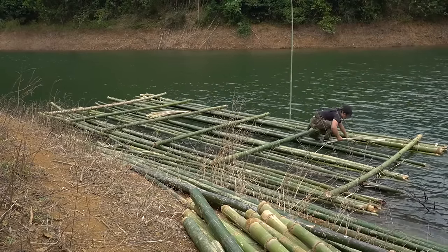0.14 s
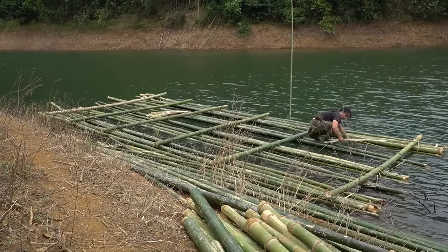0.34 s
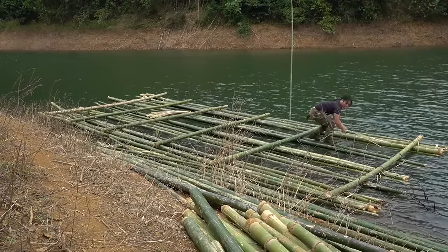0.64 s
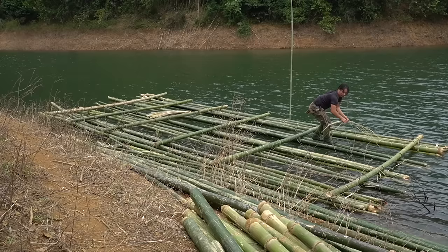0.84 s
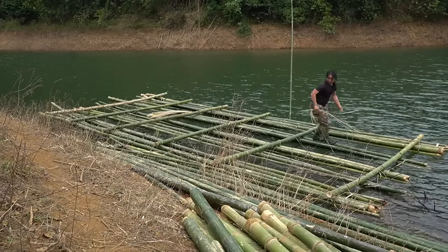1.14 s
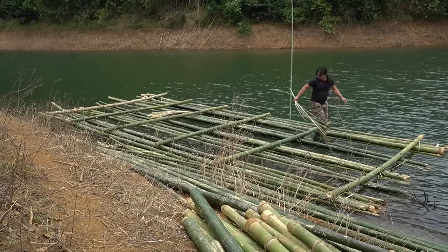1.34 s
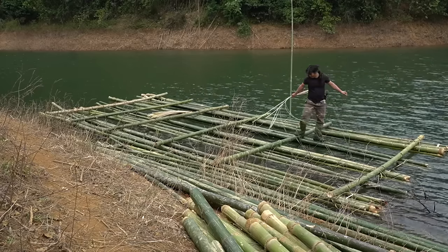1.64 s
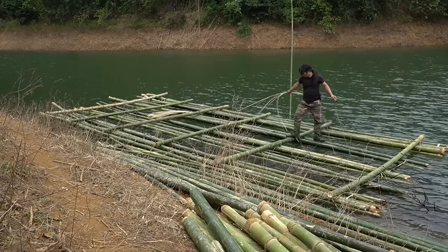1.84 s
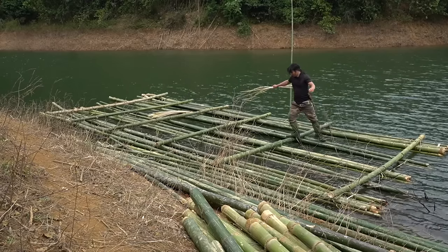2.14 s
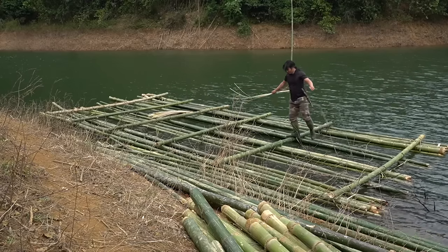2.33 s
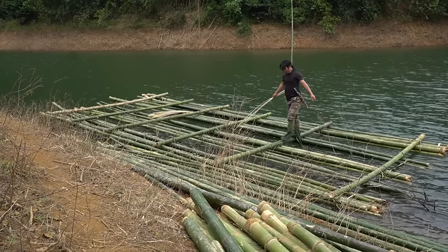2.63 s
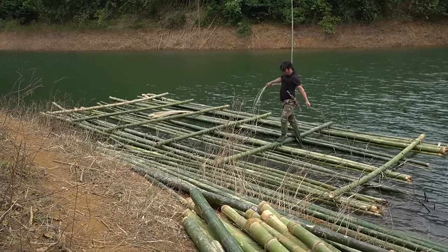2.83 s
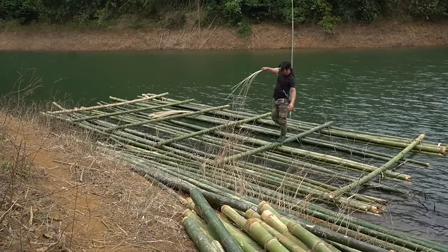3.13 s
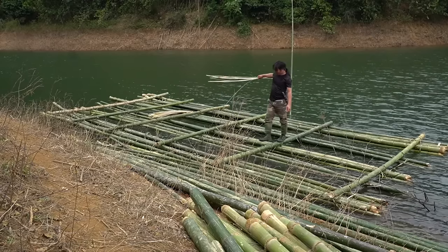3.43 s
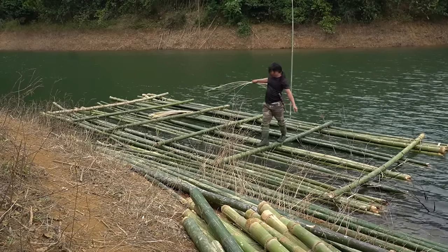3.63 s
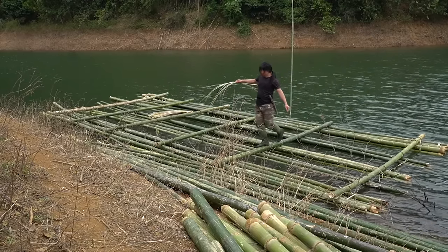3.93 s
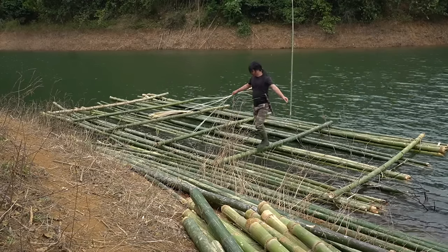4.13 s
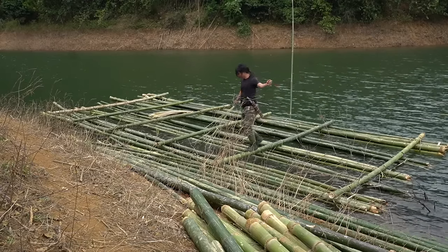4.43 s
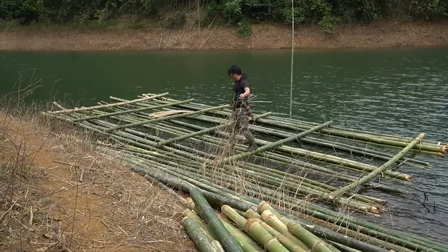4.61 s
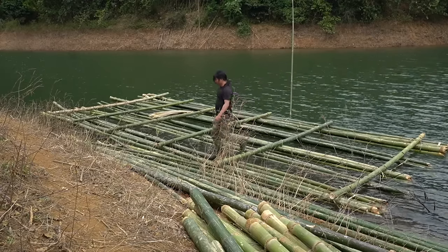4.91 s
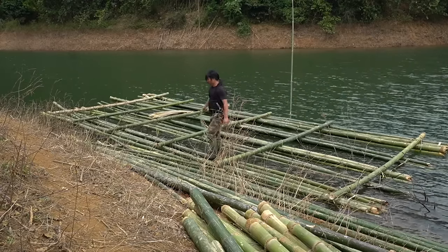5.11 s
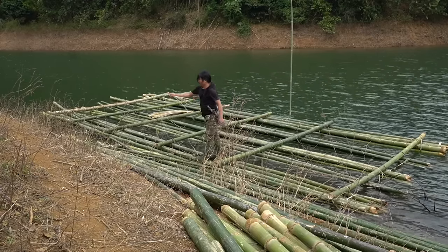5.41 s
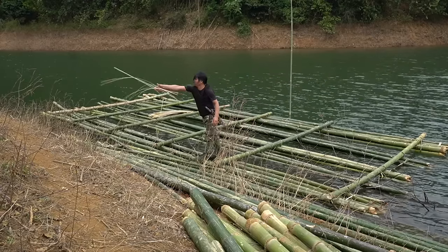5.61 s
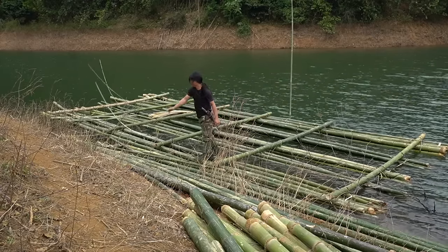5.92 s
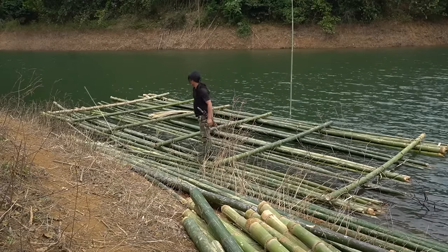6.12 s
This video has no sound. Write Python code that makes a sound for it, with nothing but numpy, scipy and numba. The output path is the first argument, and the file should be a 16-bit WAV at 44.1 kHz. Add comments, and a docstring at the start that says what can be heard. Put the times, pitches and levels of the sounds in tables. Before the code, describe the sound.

Hollow bamboo poles knock and tick under someone's steps on a floating raft, water gurgling between them, while wind gusts rumble on the microphone.

```python
"""Gusts buffet the microphone and water laps, while hollow poles knock and tick under someone's steps.
Place: loose bamboo poles of a raft on a lake. Microphone: on the shore, some metres off, two close ports.
Wind is noise evened out into a throb; water is grainy noise with rising bubble tones between the poles.
Ticks are short noise bursts; knocks are decaying chamber tones plus a rattle in the raft's modes."""
import sys
import numpy as np
from scipy import signal
from scipy.fft import rfft, irfft
from scipy.io import wavfile
from scipy.ndimage import uniform_filter1d, minimum_filter1d
from numba import njit

SR = 44100
rng = np.random.default_rng(int(sys.argv[2]) if len(sys.argv) > 2 else 0)


def master_out(mix):
    """Clip the mix to full scale and print it as 16-bit PCM to the path in sys.argv[1]."""
    frames = np.transpose(np.atleast_2d(mix))
    ceiling = np.clip(frames, -1, 1)
    pcm = np.round(ceiling * 32767).astype(np.int16)
    wavfile.write(sys.argv[1], SR, pcm)


N = 276048

# wind on the capsule: t/s, gust level/dB
GUSTS = [(0.0, -28), (0.05, -43), (0.14, -19.5), (0.57, -14), (0.61, -26), (0.64, -12.5), (0.7, -24),
         (0.77, -17), (0.91, -26.5), (1.06, -8), (1.11, -22), (1.25, -24.5), (1.31, -25), (1.36, -14),
         (1.48, -17.5), (1.51, -32), (1.57, -28.5), (1.73, -12), (2.3, -14), (2.34, -19.5), (2.41, -16.5),
         (2.44, -28), (2.6, -16), (2.79, -14.5), (2.96, -31.5), (3.01, -24), (3.14, -31), (3.24, -18),
         (3.52, -34.5), (4.15, -25.5), (4.2, -17), (5.21, -25.5), (5.4, -18.5), (5.44, -27.5), (5.53, -15),
         (5.68, -12), (5.72, -24), (6.12, -12), (6.17, -22.5), (6.26, -17.5)]
# colour of the wind: t/s, throb level/dB re gust, throb centre f/Hz, flutter level/dB re gust
EDDIES = [(0, -11, 58, -4), (.2, -6, 61.2, -19), (.55, -5.5, 59, -12), (.95, -2.5, 58, -9.5),
          (1.2, -3, 58, -7), (1.5, -8.5, 57.6, -16.5), (1.68, -3, 61, -3), (1.9, -4.5, 60, -5.5),
          (2.45, -3, 57.8, -8), (2.75, -1.5, 57, -5.5), (2.9, -6.5, 59.6, -16.5), (3.5, -9, 59.4, -14.5),
          (3.75, -14, 66.4, -2), (4.08, 1.5, 59, -21), (4.17, -4.5, 58, -7), (4.35, -1.5, 58, -16.5),
          (4.7, 1.5, 68.6, -17.5), (5.3, -3, 56.7, -17.5), (5.6, 4, 72.4, -7), (5.78, -1.5, 68.5, -1.5),
          (6.05, 2, 87, -8.5), (6.26, -0.5, 86, -5)]
# wind colours, applied twice: f/Hz, level/dB per pass
RUMBLE_COLOUR = [(20, -1), (30, -4), (44, -6), (58, -2)]
FLUTTER_COLOUR = [(100, 1), (130, -0.5), (170, -3.5), (220, -6), (300, -13)]
# calm water round the raft, before chance swell: t/s, lapping level/dB, spray level/dB
CALM_WATER = [(0, -38.5, -54), (.4, -39.5, -55), (.95, -38, -48), (1.12, -49, -59), (1.2, -36.5, -45),
              (1.42, -36.5, -51), (1.58, -41.5, -55), (1.8, -50, -61), (1.95, -42.5, -59), (2.2, -46, -70),
              (2.45, -40.5, -57), (2.65, -38, -55), (2.78, -41.5, -56.5), (3.2, -42, -59.5),
              (3.5, -39.5, -60), (4.2, -38.5, -54.5), (4.65, -37, -60), (5.3, -38, -51.5),
              (5.65, -42.5, -60), (6.26, -40, -53)]
# water pushed up between the poles by a step:
# peak t/s, gurgle level/dB, slosh level/dB, fizz level/dB, length/s
SURGES = [(0.487, -43, -30.5, -39.5, 0.21), (0.695, -43, -41, -38, 0.12), (1.02, -39, -33, -39.5, 0.11),
          (1.159, -38, -45, -36, 0.038), (1.27, -33, -46, -54, 0.054), (1.458, -44, -25, -31, 0.056),
          (1.659, -29.5, -32, -39.5, 0.085), (1.833, -36.5, -39, -55, 0.073),
          (2.224, -36, -35.5, -43.5, 0.077), (2.434, -61, -43, -55, 0.15), (2.727, -30, -37, -61.5, 0.019),
          (2.82, -31.5, -31, -61, 0.043), (3.112, -31, -33.5, -39.5, 0.2), (3.165, -39, -32, -39, 0.047),
          (3.258, -35, -30, -40, 0.064), (3.399, -32, -35, -59, 0.087), (3.602, -26.5, -49, -51, 0.028),
          (3.666, -37, -42, -36.5, 0.11), (3.795, -30.5, -26.5, -34.5, 0.18), (3.955, -29, -32, -41, 0.048),
          (4.225, -34.5, -44, -37, 0.064), (4.327, -32.5, -37, -39.5, 0.073),
          (4.497, -26.5, -27.5, -37, 0.066), (4.701, -33.5, -33, -58, 0.099),
          (4.837, -25, -26.5, -37, 0.068), (4.88, -22.5, -29.5, -41, 0.088),
          (5.027, -27, -31, -33.5, 0.073), (5.271, -22, -29, -33.5, 0.051), (5.57, -36, -28, -35, 0.055),
          (6.031, -29.5, -36, -40, 0.078), (6.158, -33.5, -28, -39, 0.083), (6.25, -37, -24, -30.5, 0.2)]
# water colours, deep to airy: f/Hz, level/dB (per Hz)
GURGLE_COLOUR = [(240, 4.5), (350, 4.5), (520, 4), (640, 4)]
SLOSH_COLOUR = [(560, -9), (700, 0), (880, 8.5), (1100, -0.5), (1450, -2), (1700, -6), (2200, -16)]
FIZZ_COLOUR = [(1800, 5), (2500, 6), (3550, 6), (4300, 0.5), (5800, 0.5), (7200, -11), (8500, -17)]
SPRAY_COLOUR = [(7000, 7), (8500, 3), (11000, 6), (14500, 0.5), (16000, -7)]  # also the airy top of the ticks
# dry ticks and scuffs: t/s, nominal peak level/dB, crack centre f/Hz, airy top level/dB re crack, t60/s
TICKS = [(0.0497, -19.5, 2670, -10, 0.021), (0.4064, -20.5, 3190, -25, 0.045), (0.4246, -22, 3070, 0, .022),
         (.547, -14, 2440, -30, 0.016), (0.593, -18, 3210, -30, .012), (.669, -21.5, 3450, 0, 0.024),
         (.7316, -19.5, 3260, -7, 0.031), (.852, -9, 2850, -15, 0.041), (0.979, -23.5, 5730, -0.5, 0.029),
         (1.1638, -22, 3280, -23, 0.018), (1.292, -21, 5040, -1.5, 0.066), (1.3333, -16, 3270, -28, 0.013),
         (1.4724, -9.5, 3620, 0, 0.021), (1.665, -17, 2740, -24, 0.017), (1.6924, -21, 2490, -8, .022),
         (1.703, -16.5, 4640, -9, .016), (1.7142, -19.5, 4950, -1, 0.021),
         (1.912, -21.5, 2700, -2.5, 0.056), (1.9577, -20.5, 5400, -18, .023),
         (1.9824, -31, 4000, -10, 0.012), (2.002, -9.5, 3440, -32, .012), (2.1161, -21.5, 3320, -11, 0.023),
         (2.4255, -22.5, 3540, -29, .027), (2.469, -27.5, 3570, 2, 0.012), (2.5092, -17, 3370, -25, .026),
         (2.6334, -21, 3500, -7, 0.021), (2.927, -20, 4500, -14, 0.027), (3.0644, -20, 2530, -30, 0.02),
         (3.1708, -18.5, 5400, -7, 0.021), (3.275, -18.5, 4140, -25, 0.022), (3.2816, -34, 5000, 1, .018),
         (3.635, -19, 2420, -18, .032), (3.71, -20, 4900, -22, 0.028), (3.7745, -18, 3770, -30, 0.028),
         (3.8796, -15, 4960, -30, 0.013), (3.937, -25, 3330, -30, 0.015), (3.956, -8, 3330, -14, 0.019),
         (4.027, -22, 2970, -22, 0.017), (4.183, -21, 5300, -12, 0.032), (4.2057, -19.5, 3400, -20, 0.031),
         (4.271, -19, 3430, -11, 0.05), (4.461, -18, 3370, -16, 0.046), (4.4903, -16, 3300, -40, 0.027),
         (4.5034, -14, 4360, -38, 0.023), (4.6885, -19.5, 3600, -38, 0.029), (4.808, -13, 3970, -24, 0.019),
         (4.818, -18, 2580, -8, .03), (4.865, 1.5, 2570, -20, 0.023), (4.893, -4.5, 2870, -16, .05),
         (4.9071, -13, 4250, -13, .043), (5.006, -12, 6200, -11, .01), (5.013, -10.5, 2600, -22, .03),
         (5.051, -12.5, 3670, -8, .015), (5.0901, -16, 4900, 0, 0.009), (5.234, -20, 3630, -20, .026),
         (5.254, -8.5, 3170, -10, 0.021), (5.2728, -12, 3320, -30, 0.029), (5.3192, -13.5, 3060, -12, .015),
         (5.3887, -21.5, 3500, -8, .031), (5.4306, -25, 3070, -2, .02), (5.551, -15.5, 3980, -28, 0.069),
         (5.886, -29.5, 5000, 6, 0.014), (5.893, -22.5, 3500, -8, 0.02), (5.9399, -24, 2800, -15, .02),
         (5.953, -21.5, 3100, -20, 0.018), (6.042, -21, 3000, -10, 0.013), (6.058, -21.5, 3480, -4, .03),
         (6.132, -22, 3740, -2, .02), (6.157, -19.5, 3550, -5, .046), (6.188, -14.5, 5160, -11, 0.037),
         (6.205, -16, 3000, -4, .04), (6.2425, -11.5, 5000, -22, 0.024)]
# broad snap of a tick: f/Hz, level/dB (per Hz)
SNAP_COLOUR = [(500, -16), (1500, 5), (3500, 3), (6000, 0), (8000, -39)]
# poles knocking: t/s, nominal peak level/dB, starting pitch of the struck chamber f/Hz,
# level of the shaking that drives the rattle/dB re blow
KNOCKS = [(.099, -31, 413, -5), (.377, -31.5, 854, 1), (.425, -24, 890, -8), (.461, -20, 970, -6),
          (.554, -14.5, 794, -29), (.596, -20.5, 707, -15), (.621, -20.5, 1630, -7), (.655, -25, 880, -23),
          (.702, -15, 730, -17), (.731, -16.5, 897, -27), (.853, -24, 774, -14), (1.011, -29, 1200, -9),
          (1.045, -15, 1100, -21), (1.109, -23, 860, -14), (1.249, -24, 520, -17), (1.333, -23, 994, -1.5),
          (1.438, -22, 846, -20), (1.464, -13.5, 906, -8), (1.664, -23, 700, -8), (1.811, -26, 1060, -3),
          (1.841, -17.5, 870, -21), (2.052, -26, 755, -24), (2.204, -32, 1560, -3), (2.217, -24, 600, -19),
          (2.385, -27, 1760, -9), (2.405, -12, 1100, -15), (2.422, -20, 865, -22), (2.469, -17, 1670, -3),
          (2.533, -30, 869, -8), (2.57, -22, 943, -8.5), (2.733, -22, 880, -14), (2.813, -17, 880, -15.5),
          (2.885, -20.5, 866, -7.5), (2.936, -28.5, 1100, -6), (3.063, -16, 1870, -11),
          (3.089, -23, 380, -15), (3.147, -29, 810, -5), (3.186, -17, 1720, -8), (3.241, -5.5, 1070, -15),
          (3.253, -21, 880, -3), (3.362, -20, 372, -16), (3.38, -12, 673, -31), (3.423, -23, 916, -12),
          (3.592, -26, 660, -12), (3.703, -19.5, 950, -27), (3.716, -15, 790, -11),
          (3.799, -14.5, 1620, -6.5), (3.848, -20.5, 2030, -21), (3.899, -6, 900, -15.5),
          (3.912, -12, 900, -26), (3.945, -23, 845, -11), (4.112, -23.5, 1070, -5), (4.221, -21, 540, -23),
          (4.322, -9.5, 340, -22.5), (4.488, -13, 910, -18), (4.503, -10.5, 826, -33),
          (4.669, -24, 1085, -2.5), (4.839, -15, 636, -17), (4.863, -8.5, 670, -7),
          (4.898, -17.5, 594, -1.5), (5.013, -13, 1670, -23), (5.111, -24.5, 900, -10),
          (5.146, -27, 910, -7), (5.254, -18, 1660, -9), (5.273, -16.5, 337, -5), (5.422, -10, 1230, -14.5),
          (5.555, -15.5, 1680, -15), (5.568, -21, 910, -10), (5.622, -22.5, 840, -8),
          (5.895, -29, 900, -15), (6.023, -24, 506, -14.5), (6.072, -20.5, 557, -27),
          (6.136, -19, 920, -19), (6.208, -16, 766, -15)]
# modes of the loose raft: f/Hz, relative level/dB, t60/s
RAFT_MODES = [(364, -12, 0.021), (683, -9.5, 0.0088), (920, -1, 0.036), (1123, -0.5, 0.0092),
              (1620, -13, 0.013), (1900, -21, 0.015), (3350, -12.5, 0.01)]

RUMBLE_DB = -1  # re gust
EDDIES_PER_S, EDDY_DB, FLUTTER_SWELL_DB = 14, 1.5, 2.5  # chance swell of the wind layers
LAPS_PER_S, LAP_DB = 7, 2.5  # chance swell of the calm water
LAP_GURGLE_DB, LAP_SLOSH_DB = -6, -0.5  # re lapping
SURGE_RISE, SURGE_FALL = 0.26, 1.57  # rise time as share of the length; steepness of the fall
SURGE_SPRAY_DB = -17.5  # re fizz
TICK_RISE = 0.054  # build-up time as share of the t60
# ring at 1 kHz and -20 dB; higher chambers and harder blows die sooner
KNOCK_T60_S, KNOCK_T60_POWER, HALVED_PER_DB = 0.035, -0.25, 22
# second mode of a chamber, re its pitch and peak
OVERTONE, OVERTONE_DB, OVERTONE_T60_S = 1.42, -10.5, 0.012
KNEE, CEILING, TOP_HZ = .55, .71, 16250


def undb(db):
    """Amplitude ratio of a level in dB."""
    return 10 ** (np.asarray(db) / 20)


def unit(x):
    """Scale to an rms of 1."""
    return x / np.sqrt(np.mean(x ** 2))


def curves(table):
    """Columns of a table, one value per sample."""
    s, *columns = np.transpose(table)
    return [np.interp(np.arange(N) / SR, s, c) for c in columns]


@njit
def svf(x, hz, width):
    """State-variable band-pass whose centre and width may move."""
    y, b, l = np.empty(len(x)), 0., 0.  # b, l: band and low-pass memories
    for i in range(len(x)):
        g, k = np.tan(np.pi * hz[i] / SR), width[i] / hz[i]
        v = (b + g * (x[i] - l)) / (1 + g * (g + k))
        b, l, y[i] = 2 * v - b, l + 2 * g * v, k * v
    return y


def band(x, hz, width):
    """Band-pass with a fixed centre and width in Hz."""
    return svf(x, hz + np.zeros(len(x)), width + np.zeros(len(x)))


def shape(x, points):
    """Colour by (Hz, dB) points, falling steeply outside them."""
    hz, db = np.transpose(points)
    f = np.log(np.arange(len(x) // 2 + 1) * SR / len(x) + 1)
    outside = np.maximum(np.log(hz[0]) - f, 0) + np.maximum(f - np.log(hz[-1]), 0)
    gain = undb(np.interp(f, np.log(hz), db) - 60 * outside)
    return irfft(rfft(x) * gain, len(x))


def walk(rate):
    """Random levels held 1 / rate s and slewed twice; rms 1."""
    k = int(SR / rate)
    steps = np.repeat(rng.standard_normal(N // k + 1), k)
    return unit(uniform_filter1d(uniform_filter1d(steps, k), k)[:N])


def add(out, s, sound):
    """Mix a sound in at time s."""
    i = int(max(s, 0) * SR)
    out[i:i + len(sound)] += sound[:N - i]


def ring(hz, t60, rise, glide=0.):
    """A decaying tone that builds up over the rise time, its pitch gliding; peak near 1."""
    t = np.arange(int(.15 * SR)) / SR
    swing = (1 - np.exp(-t / max(rise, 1 / SR))) * 1000. ** (-t / max(t60, .003))
    return swing / swing.max() * np.sin(2 * np.pi * hz * (t + glide * t ** 2))


def buffet(colour, span, share):
    """Noise coloured twice; in between its swing is evened out over span s, so that it throbs, not sputters."""
    x = unit(colour(rng.standard_normal(N)))
    power = uniform_filter1d(x ** 2, int(span * SR)) + 1e-3
    return unit(colour(x / power ** (share / 2)))


def eddying(x, db):
    """Let a wind layer swell by chance, db being the rms swing."""
    return unit(x * undb(db * walk(EDDIES_PER_S)))


def wind():
    """Eddies on the capsule: a deep rumble, a wandering throb and a flutter on top, each swelling by chance."""
    (gust_db,), (throb_db, hz, flutter_db) = curves(GUSTS), curves(EDDIES)
    hz = hz * np.exp(0.075 * walk(11.0))
    width = 0.92 * hz
    rumble = buffet(lambda x: shape(x, RUMBLE_COLOUR), 0.12, 0.93)
    throb = buffet(lambda x: svf(svf(x, hz, width), hz, width), 0.058, 0.37)
    flutter = buffet(lambda x: shape(x, FLUTTER_COLOUR), 0.023, 0.15)
    mix = undb(RUMBLE_DB) * eddying(rumble, EDDY_DB)
    mix = mix + undb(throb_db) * eddying(throb, EDDY_DB)
    mix = mix + undb(flutter_db) * eddying(flutter, FLUTTER_SWELL_DB)
    return undb(gust_db) * mix


def grains(rate, scatter_db, smear):
    """Noise whose level jumps with dense small events (rate per s) of uneven size, each with a short tail."""
    size = undb(scatter_db * np.minimum(rng.exponential(size=N), 4))
    hits = (rng.random(N) < rate / SR) * size
    power = signal.lfilter([1], [1, -np.exp(-1 / (smear * SR))], hits ** 2)
    return unit(rng.standard_normal(N) * np.sqrt(1 + power))


def bubbles(rate, low_hz, high_hz, cycles, scatter_db):
    """Trapped air: short rising tones of chance pitch and size, their decay set in cycles."""
    out = np.zeros(N)
    for when, pitch, size in rng.random((int(rate * N / SR), 3)):
        hz = low_hz * (high_hz / low_hz) ** pitch
        level = undb(-scatter_db * np.log(size + 0.023))
        add(out, when * N / SR, level * ring(hz, cycles / hz, 1 / hz, 0.0033 * hz))
    return unit(out)


def surges():
    """Power of gurgle, slosh and fizz: each surge rises as a bell and drains away."""
    t, power = np.arange(N) / SR, np.zeros((3, N))
    for s, *db, length in SURGES:
        rise = ((t - s) / (SURGE_RISE * length)) ** 2
        drain = (np.abs(t - s) / length) ** SURGE_FALL * 2
        swell = np.exp(-np.where(t < s, rise, drain))
        power = power + undb(db)[:, None] ** 2 * swell
    return power


def lapping(calm_db, surge_power):
    """Amplitude of a water layer: calm level swelling by chance, plus the surges, summed as power."""
    return np.sqrt(undb(calm_db + LAP_DB * walk(LAPS_PER_S)) ** 2 + surge_power)


def water():
    """Gurgle and slosh with bubbles, fizz and spray: calm lapping plus the surges."""
    lap_db, spray_db = curves(CALM_WATER)
    low, mid, high = surges()
    gurgle = unit(shape(grains(80, 4.1, 0.012), GURGLE_COLOUR))
    gurgle = gurgle + undb(-15.5) * bubbles(27, 257, 670, 8.8, 1.0)
    slosh = unit(shape(grains(110, 1.97, 0.0016), SLOSH_COLOUR))
    slosh = slosh + undb(-7) * bubbles(62, 670, 1930, 27, 1.5)
    fizz = unit(shape(grains(120, 3.38, 0.00096), FIZZ_COLOUR))
    fizz = fizz + undb(-13) * bubbles(60, 1904, 6340, 47, 1.6)
    spray = unit(shape(grains(97, 5.5, 0.00055), SPRAY_COLOUR))
    out = lapping(lap_db + LAP_GURGLE_DB, low) * gurgle
    out = out + lapping(lap_db + LAP_SLOSH_DB, mid) * slosh
    out = out + lapping(lap_db, high) * fizz
    return out + lapping(spray_db, high * undb(SURGE_SPRAY_DB) ** 2) * spray


def ticks():
    """Short bursts of noise: a coloured crack, a broad snap and an airy top that dies faster."""
    out, n = np.zeros(N), SR // 10
    t = np.arange(n) / SR
    for s, db, hz, top_db, t60 in TICKS:
        crack_noise, top_noise, snap_noise = rng.standard_normal((3, n))
        fade = (1 - np.exp(-t / (TICK_RISE * t60))) * 1000. ** (-t / t60)
        fade = fade / fade.max()
        crack = unit(band(crack_noise, hz, 0.1 * hz))
        crack = crack + undb(0.5) * unit(shape(snap_noise, SNAP_COLOUR))
        top = undb(top_db) * unit(shape(top_noise, SPRAY_COLOUR))
        # noise peaks stand some dB above its rms
        add(out, s, undb(db - 12) * (crack * fade + top * fade ** 1.22))
    return out


def knocks():
    """Each blow rings the struck chamber and jolts the raft; loose poles rattle, a fading noise in its modes."""
    out, shaking, n = np.zeros(N), np.zeros(N), SR // 5
    t = np.arange(n) / SR
    jolt = undb(5.5) * np.exp(-((t - .0018) / .00007) ** 2)  # the push peaks as the contact closes
    rattle_fade = (1 - np.exp(-t / 0.001)) * 1000. ** (-t / 0.13)
    for s, db, hz, rattle_db in KNOCKS:
        t60 = KNOCK_T60_S * (hz / 1000) ** KNOCK_T60_POWER / 2 ** ((db + 20) / HALVED_PER_DB)
        chamber = ring(hz, t60, 0.039 * t60, 0.58)
        overtone = undb(OVERTONE_DB) * ring(OVERTONE * hz, OVERTONE_T60_S, 0.00045)
        add(out, s, undb(db) * (chamber + overtone))
        add(shaking, s, undb(db + rattle_db) * (jolt + rng.standard_normal(n) * rattle_fade))
    raft = np.zeros(N)
    for hz, db, t60 in RAFT_MODES:
        width = np.log(1000) / np.pi / t60  # bandwidth of a mode that rings for t60
        raft += undb(db) * band(shaking, hz, width)
    # fibrous wood radiates little treble
    return out + undb(17.0) * shape(raft, [(200, -2.0), (3500, -0.4), (6000, -18)])


def scene():
    """Wind and raft at two ports that nearly coincide: left takes a little more wind, the raft's treble differs."""
    gusts = wind()
    raft = water() + ticks() + knocks()
    apart = undb(-26) * shape(np.roll(raft, 40), [(4500, -20), (9000, -7), (15000, 0)])
    side = undb(-31.7) * shape(gusts, [(15, 0), (80, -1), (180, -3), (400, -4)]) + apart
    return np.array([gusts + raft + side, gusts + raft - side])


def record(dry):
    """A fast limiter holds the loudest moments down, the input clips what slips past, and the top is cut."""
    window = SR // 60
    loudest = -minimum_filter1d(-np.abs(dry).max(axis=0), window)  # running maximum
    peak = uniform_filter1d(loudest, window)
    held = dry * np.minimum(1, KNEE / peak) ** .6
    clipped = np.clip(held, -CEILING, CEILING)
    top_cut = signal.ellip(10, .2, 80, TOP_HZ, fs=SR, output="sos")
    return signal.sosfilt(top_cut, clipped)


dry = scene()
out = record(dry)
master_out(out)
```